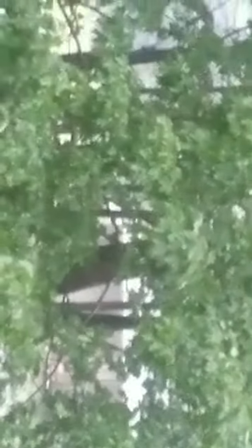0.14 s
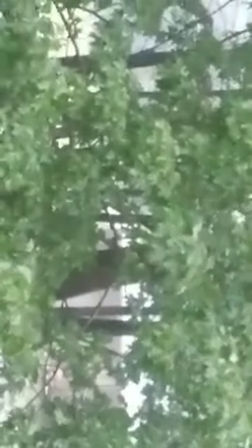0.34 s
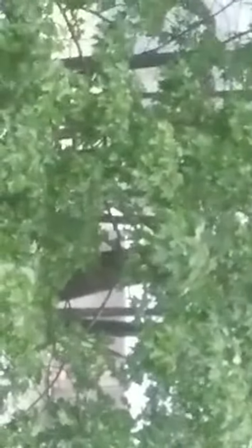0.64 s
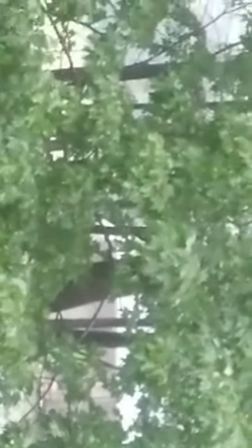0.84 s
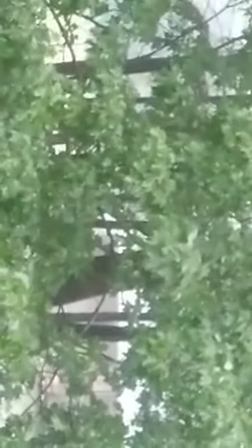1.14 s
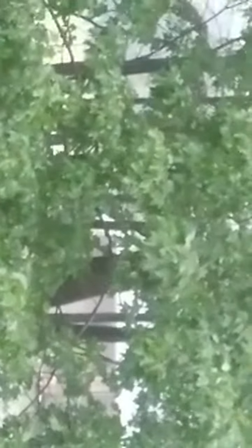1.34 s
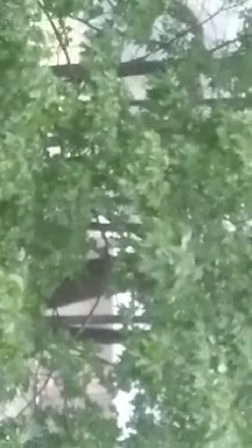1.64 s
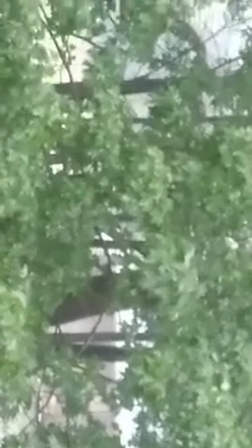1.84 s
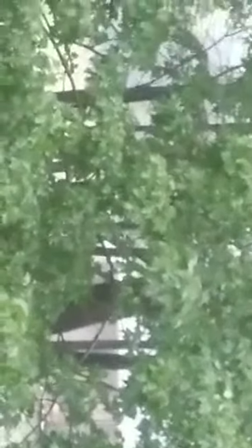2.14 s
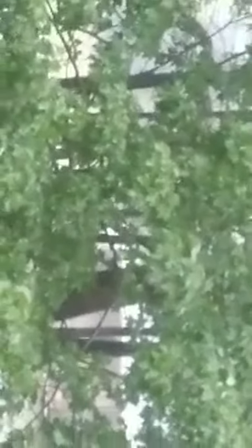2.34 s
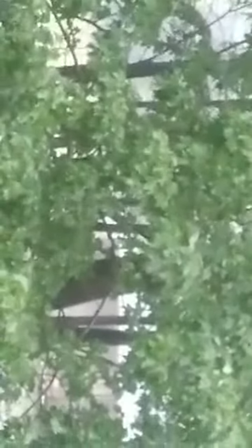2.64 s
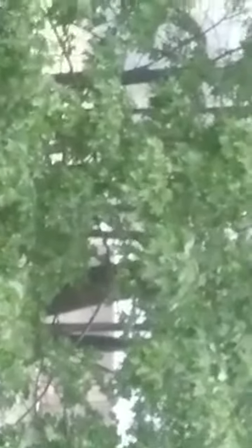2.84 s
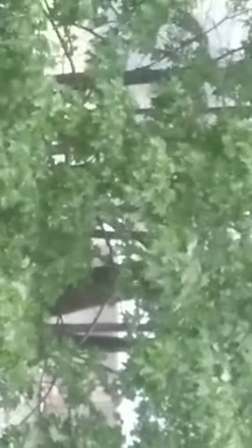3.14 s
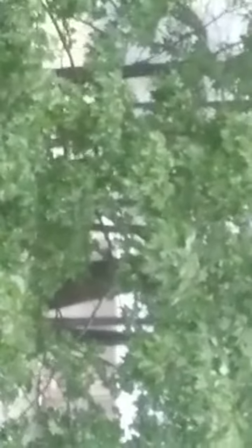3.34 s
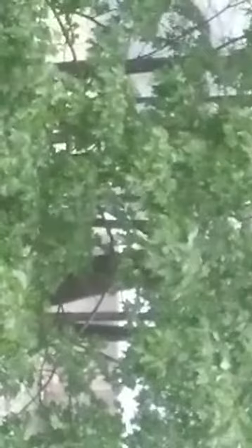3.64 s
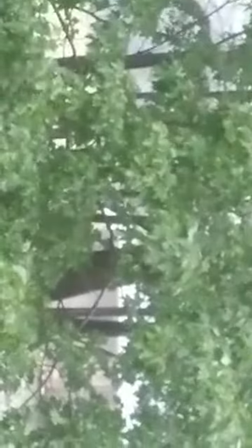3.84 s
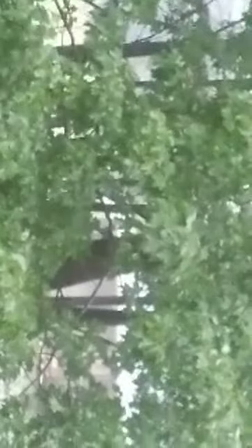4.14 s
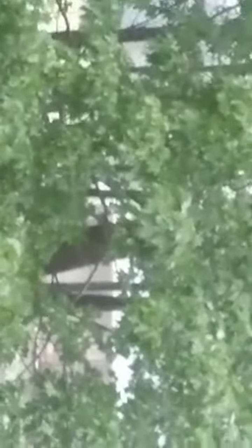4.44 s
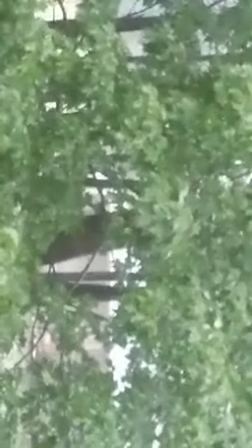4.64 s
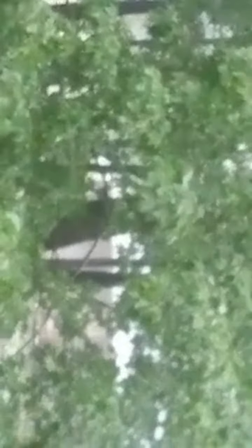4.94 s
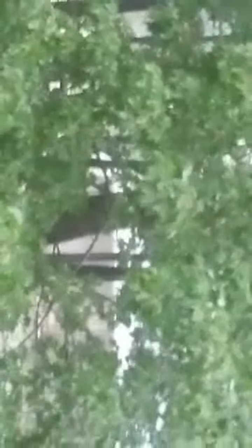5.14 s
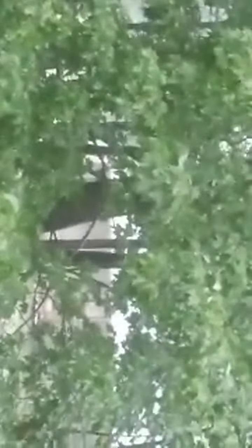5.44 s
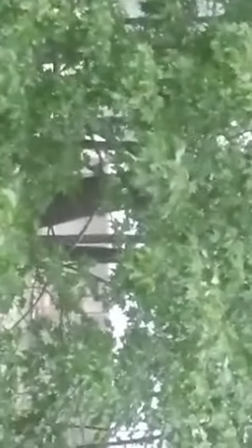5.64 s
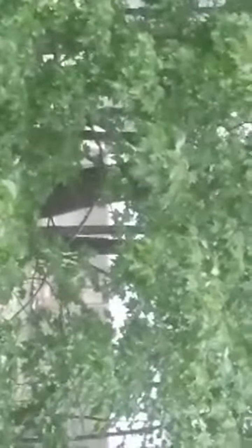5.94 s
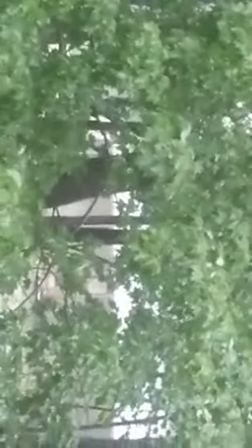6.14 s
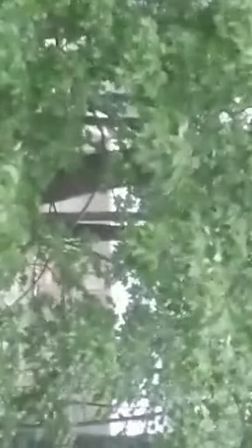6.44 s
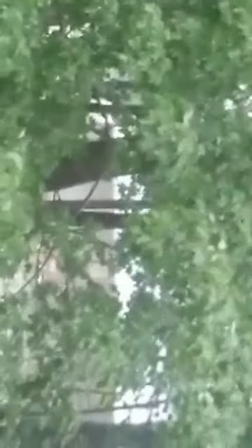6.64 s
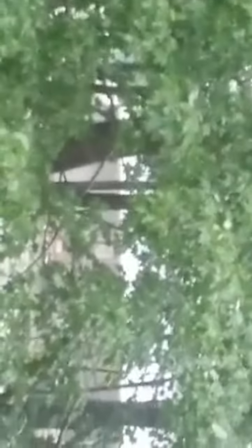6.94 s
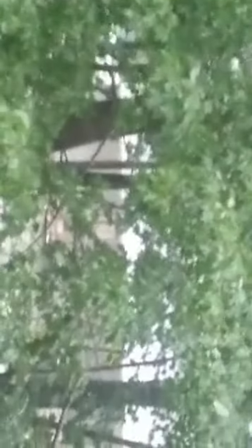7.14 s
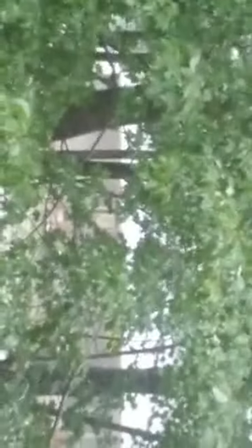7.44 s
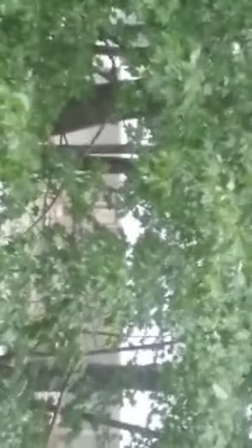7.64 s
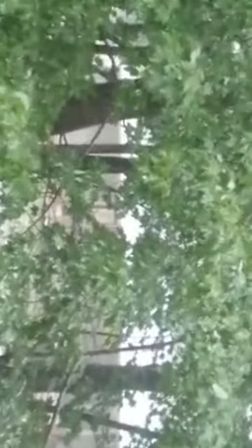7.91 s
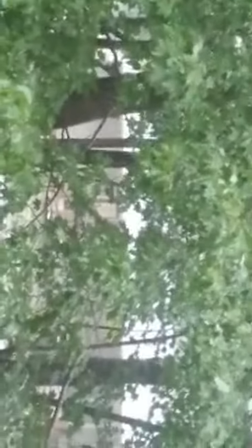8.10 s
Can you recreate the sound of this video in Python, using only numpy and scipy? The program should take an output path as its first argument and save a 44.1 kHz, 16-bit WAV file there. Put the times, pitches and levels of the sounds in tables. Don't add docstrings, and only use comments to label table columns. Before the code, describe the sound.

Outdoors among dense green trees near houses, light rain makes a quiet, steady hiss with a low distant murmur. Irregular nearby drops splash, thump dully on broad leaves, tick and ping. Just before the middle the loudest drop clacks on thin metal and rings briefly, followed by sprays and small bright chimes. Scattered drops continue to the end. A single phone microphone's noise gate chops their tails.

```python
import sys
import numpy as np
from scipy import signal
from scipy.fft import rfft, irfft, next_fast_len
from scipy.io import wavfile
from scipy.ndimage import uniform_filter1d

SR = 44100
rng = np.random.default_rng(int(sys.argv[2]) if len(sys.argv) > 2 else 0)


def boost(x):
    u = np.asarray(x, float) / 20
    return 10 ** u


def int16_out(signal):
    q = np.round(np.clip(np.atleast_2d(signal).T, -1, 1) * 32767)
    wavfile.write(sys.argv[1], SR, q.astype(np.int16))


N = 364707


def shaped(x, gain):
    size = next_fast_len(len(x))
    hz = np.maximum(np.fft.rfftfreq(size, 1 / SR), 1)
    return irfft(rfft(x, size) * gain(hz), size)[:len(x)]


def unit(x):
    return x / np.sqrt(np.mean(x ** 2))


def walk(rate):
    hold = int(SR / rate)
    steps = np.repeat(rng.standard_normal(N // hold + 1), hold)
    slewed = uniform_filter1d(uniform_filter1d(steps, hold), hold)
    return unit(slewed[:N])


def add(out, peak_s, rise_s, fade_s, wave):
    t = np.arange(len(wave)) / SR - rise_s
    swell = np.sin(np.pi / 2 * (1 + t / rise_s)) ** 2
    decay = np.exp(-np.maximum(t, 0) / fade_s)
    shape = np.where(t < 0, swell, decay)
    at = int((peak_s - rise_s) * SR) + np.arange(len(wave))
    inside = (at >= 0) & (at < N)
    out[at[inside]] += (shape * wave)[inside]


def rings(rows, partner=0.41, detune=0.029, count=2, trim_db=1.0):
    out = np.zeros(N)
    chances = rng.random((len(rows), 2, count + 1, 1))
    for (s, hz, db, rise_ms, t60_ms), (pitch, phase) in zip(rows, chances):
        rise = max(rise_ms, .5) / 1000
        fade = max(t60_ms, 2) / 1000 / np.log(1000)
        turn = 2 * np.pi * hz * np.arange(int((rise + 6 * fade) * SR)) / SR
        main = np.sin(turn + 2 * np.pi * phase[0])
        detuned = turn * (1 + detune * (2 * pitch[1:] - 1))
        neighbours = np.sin(detuned + 2 * np.pi * phase[1:]).sum(axis=0)
        add(out, s, rise, fade, boost(db - trim_db) * (main + partner * neighbours))
    return out


def splashes(rows, spread, rise_ms=1.5, stretch=1.26, size=2048):
    out = np.zeros(N)
    for (s, db, centre_hz, fade_ms), spray in zip(rows, rng.standard_normal((len(rows), size))):
        burst = shaped(spray, lambda hz: np.exp(-(np.log(hz / centre_hz) / spread) ** 2 / 2))
        fade = stretch * max(fade_ms, .3) / 1000
        add(out, s, rise_ms / 1000, fade, boost(db) * unit(burst))
    return out


# frequency in Hz, level in dB per Hz.
FAR_SPECTRUM = [(15, -57), (25, -33), (108, -5.5), (249, -2), (317, -4.5), (354, -5), (516, -8.5),
                (695, -11), (863, -11.5), (1160, -11.5), (1790, -9.5), (2000, -11), (3250, -12.5),
                (8360, -11.5), (16000, -25)]
# centre in Hz, width in Hz, lift in dB.
RESONANCES = [(1851, 71, 6), (6900, 1270, 5), (8260, 450, 4), (8900, 380, 1.5), (11500, 670, 1.5),
              (15300, 340, 7)]


def colour(hz):
    far_hz, far_db = np.transpose(FAR_SPECTRUM)
    db = np.interp(np.log(hz), np.log(far_hz), far_db)
    lift_db = sum(lift / (1 + (2 * (hz - f) / width) ** 2) for f, width, lift in RESONANCES)
    return boost(db + lift_db)


# time in seconds, hiss in dB, murmur in dB relative to the hiss.
SHOWER_STRENGTH = [
    (0.0, -59, -0.5),
    (0.76, -59, 0.5),
    (5.27, -59.5, -1.5),
    (5.53, -58, -0.5),
    (6.86, -59, 1.5),
    (7.07, -58, -0.5),
    (7.56, -59.5, 0),
    (8.27, -58.5, -1),
]


def hiss(swell_db=0.57, flicker_db=0.7, trim_db=2):
    s, hiss_db, murmur_db = np.transpose(SHOWER_STRENGTH)
    t = np.arange(N) / SR
    hiss_db, murmur_db = np.interp(t, s, hiss_db), np.interp(t, s, murmur_db)
    far = unit(shaped(rng.standard_normal(N), colour))
    swell = swell_db * walk(25)
    out = np.zeros(N)
    for centre in 16 * 2. ** np.arange(11):
        band = shaped(far, lambda hz: np.cos(np.pi / 2 * np.clip(np.log2(hz / centre), -1, 1)) ** 2)
        out += band * boost(swell + flicker_db * walk(14) + murmur_db * (centre < 600))
    return out * boost(hiss_db + trim_db)


def side_flecks(count=34, db=-63, spread=.09, low_hz=4700, high_hz=15000):
    out = np.zeros(N)
    for (when, place), noise in zip(rng.random((count, 2)), rng.standard_normal((count, 2048))):
        centre_hz = low_hz * (high_hz / low_hz) ** place
        band = unit(shaped(noise, lambda hz: abs(np.log(hz / centre_hz)) < spread))
        level = boost(db) * (colour(centre_hz) / colour(7000.0)) ** 0.89
        add(out, when * N / SR, .02, .012, level * band)
    return out * np.array([[1], [-1]])


def patter(count=700):
    s, place, size, length = rng.random((count, 4)).T
    hz = 150 * (10000 / 150) ** place ** .6
    level_db = -58 + 7 * size ** 2 + 20 * np.log10(colour(hz))
    rise_ms, t60_ms = 2 + 5 * length, 30 * (0.28 + length)
    return rings(np.transpose([s * N / SR, hz, level_db, rise_ms, t60_ms]), count=1)


def spatter(count, db, spread, scatter_db=6):
    s, place, size, length = rng.random((count, 4)).T
    level_db = db + scatter_db * size ** 2
    centre_hz, fade_ms = 5300 + 4200 * place, 0.45 + 5 * length
    return splashes(np.transpose([s * N / SR, level_db, centre_hz, fade_ms]), spread, size=1024)


# gate opening in seconds, time open in ms, lift in dB,
# splash rms in dB with the gate shut.
GATE_DROPS = [(0.402, 7.9, 13, -55.5), (0.669, 11.7, 11, -60), (0.741, 6.8, 13.5, -55),
              (0.9986, 29.7, 11.5, -65), (1.0436, 7.1, 14, -54), (1.9182, 22, 11, -65),
              (1.951, 7.2, 11, -55), (2.799, 11.5, 12, -59), (3.1206, 7.5, 14.5, -60),
              (3.367, 68.6, 11, -68), (3.5055, 47, 11.5, -56), (3.794, 160, 10, -51),
              (4.1362, 150, 11.5, -65), (4.322, 7.4, 10.5, -56), (4.6782, 52, 12.5, -54),
              (4.8272, 50, 11.5, -53), (5.3405, 14.5, 12, -55), (5.5, 24, 11, -55),
              (5.5483, 11.7, 13.5, -57), (5.676, 12.3, 11.5, -59), (6.5372, 83, 11, -53),
              (6.656, 25, 9.5, -64), (7.0302, 11.2, 12.5, -62), (7.295, 8.8, 9.5, -52),
              (8.153, 5.6, 9.5, -49), (8.2384, 15.4, 13, -61)]
# peak in seconds, rms in dB with the gate shut.
OTHER_SPLASHES = [(0.2965, -57), (0.4915, -53), (0.601, -45.5), (0.7914, -56), (0.804, -51), (1.0808, -51),
                  (1.3643, -60), (1.8008, -51), (2.925, -56), (3.4036, -52), (3.4154, -58), (3.8893, -54),
                  (3.9453, -54), (4.1199, -55), (4.5114, -48), (4.6373, -56), (4.7021, -56), (4.8651, -56),
                  (5.5195, -55), (5.5935, -53), (5.7341, -51), (5.7473, -46), (6.5, -54), (6.5697, -55),
                  (6.908, -57), (6.9161, -52), (6.9812, -59), (7.0701, -55), (7.324, -52), (7.9397, -57)]


def near_splashes(lag_ms=5, centre_hz=6230, scatter=0.11, fade_ms=2.2):
    rows = [(s + lag_ms / 1000, db) for s, *_, db in GATE_DROPS] + OTHER_SPLASHES
    chance = rng.uniform(-1.3, 1, (len(rows), 2))
    return splashes([(s, db, centre_hz * (1 + scatter * pitch), fade_ms * (1 + .3 * length))
                     for (s, db), (pitch, length) in zip(rows, chance)], spread=0.32)


# peak in seconds, pitch in Hz, peak level in dB
# with the gate shut, t60 in ms.
LEAF_THUMPS = [(0.4051, 383, -57, 85), (0.4406, 555, -53, 24), (0.6747, 259, -43, 39),
               (0.7939, 269, -46.5, 21), (0.8045, 298, -48.5, 20), (1.0044, 432, -45, 28),
               (1.0048, 290, -53.5, 32), (1.0232, 407, -50, 47), (1.8818, 227, -48, 30),
               (1.9261, 260, -45, 28), (1.939, 257, -54, 25), (2.2634, 260, -50, 19),
               (2.8059, 206, -47, 45), (3.3793, 247, -40.5, 41), (3.412, 273, -51, 65),
               (3.8461, 787, -58.5, 30), (4.01, 248, -54, 60), (4.1432, 501, -57, 39),
               (4.2926, 506, -47.5, 50), (6.664, 390, -40, 57), (6.8813, 465, -52.5, 61),
               (6.9546, 763, -59.5, 46), (7.1135, 845, -56, 24), (7.3222, 374, -53, 24),
               (7.523, 526, -52.5, 45), (7.79, 109, -57, 81), (7.87, 152, -54, 90), (3.385, 106, -60, 110),
               (8.1903, 515, -56, 33), (8.2447, 388, -47, 53)]
# peak in
# seconds, pitch in Hz, peak level in dB.
PUDDLE_PINGS = [(0.5974, 4243, -57), (1.097, 4260, -55), (1.9223, 1270, -61), (3.1248, 2317, -50),
                (3.322, 3280, -53), (3.5131, 1883, -43.5), (3.8012, 2862, -55.5), (3.8013, 2330, -57),
                (4.178, 4717, -58), (4.2922, 2947, -58), (4.6388, 3068, -57), (4.7463, 1702, -51),
                (4.8335, 1786, -49), (5.345, 4663, -50.5), (5.352, 4663, -50), (5.5554, 2330, -48),
                (5.597, 3471, -53), (5.6835, 3671, -47), (5.7061, 4158, -55), (5.7943, 2636, -55),
                (6.1731, 1685, -56), (6.4109, 2710, -57), (6.5276, 5138, -51), (6.6155, 2880, -57.5),
                (7.0732, 2214, -51.5), (7.133, 1800, -54.5), (7.3002, 3497, -52.5), (7.9606, 1795, -50),
                (8.2426, 1275, -66), (3.5141, 550, -59)]
# peak in seconds, pitch in Hz, peak level in dB.
LEAF_TICKS = [(0.2912, 7082, -54), (0.4914, 6382, -52), (0.5974, 6155, -55), (1.0487, 7106, -56),
              (1.9565, 7000, -51), (1.9594, 7935, -49), (3.1247, 6902, -55), (3.8015, 6337, -39),
              (4.1428, 6145, -50.5), (4.15, 10263, -59), (4.1732, 6459, -50), (4.1992, 7469, -44),
              (4.2154, 7438, -48), (4.5085, 6792, -59), (4.6874, 5807, -44.5), (4.7016, 8897, -51),
              (4.8307, 6616, -58), (4.8315, 8033, -46), (5.5074, 9390, -54), (5.52, 7824, -53),
              (5.6811, 5593, -55), (5.7319, 7455, -53), (6.542, 10759, -60), (6.5462, 7171, -50),
              (6.5692, 6667, -54), (6.9117, 5881, -56), (7.2978, 6664, -56)]
# peak in seconds, pitch in Hz, peak level in dB.
METAL_CHIMES = [
    (4.146, 8350, -51),
    (4.16, 6200, -54),
    (4.1735, 7520, -42.5),
    (5.6811, 10468, -65),
    (6.546, 8560, -48.5),
    (6.546, 9900, -51),
    (7.036, 6280, -49.5),
]


def near_rings():
    rows = [(s, hz, db, 10, t60_ms) for s, hz, db, t60_ms in LEAF_THUMPS]
    # its drops, rise in ms, t60 in ms
    for drops, rise_ms, t60_ms in ((PUDDLE_PINGS, 7, 45), (LEAF_TICKS, 6.5, 35), (METAL_CHIMES, 7.3, 135)):
        rows += [(*drop, rise_ms, t60_ms) for drop in drops]
    return rings(rows)


def foliage(x, db=-13, t60=.1):
    t = np.arange(8192) / SR
    tail = rng.standard_normal(len(t)) * np.exp(-t * np.log(1000) / t60) * (t > .004)
    return x + boost(db) * signal.fftconvolve(x, tail / np.linalg.norm(tail))[:N]


# peak in
# seconds, rms in dB, centre in Hz, fade in ms.
LONG_SPRAYS = [(3.8035, -40, 4850, 2.7), (3.812, -50.5, 4800, 47), (3.8, -58, 12200, 3.7),
               (3.8, -57, 14200, 6), (4.2, -59, 6140, 14), (4.148, -55.5, 10200, 27),
               (4.15, -58, 11300, 30), (4.15, -55, 6000, 20), (4.155, -60, 4600, 18),
               (4.502, -58, 6250, 36), (4.8, -62, 7037, 33), (5.508, -51, 8100, 8), (6.56, -55, 6800, 20)]


def sheet_and_leaf_sprays():
    return splashes(LONG_SPRAYS, spread=0.11, rise_ms=6, size=8192)


# peak in seconds, pitch in Hz, peak in dB, rise in ms, t60 in ms.
SHEET_MODES = [
    (3.8038, 4900, -30.5, 1.19, 9),
    (3.803, 4295, -49, 5, 260),
    (3.806, 4358, -50, 5, 230),
    (3.808, 4490, -50, 6, 220),
    (3.808, 4632, -42.5, 8, 240),
    (3.804, 4752, -45, 4, 150),
    (3.803, 5030, -41, 4.3, 45),
    (3.806, 5098, -51, 5, 200),
    (3.826, 6475, -54, 12, 170),
]


def metal_sheet():
    return rings(SHEET_MODES, partner=.22, detune=.012, count=4)


def scene():
    far = hiss() + patter() + spatter(count=250, db=-68, spread=0.39)
    far += spatter(count=900, db=-63.5, spread=.08)
    near = foliage(near_rings() + near_splashes())
    return np.tile(far + near + metal_sheet() + sheet_and_leaf_sprays(), (2, 1))


# opening in seconds, lift in dB.
GATE_FLICKERS = [(0.0027, 3), (0.3272, 7), (0.4169, 7), (0.5033, 10.5), (1.0776, 6), (1.0968, 5),
                 (1.2462, 9.5), (1.3191, 5.5), (2.0177, 3), (2.0806, 9), (2.6246, 4.6), (2.9211, 9.5),
                 (4.117, 6), (4.499, 7.5), (4.635, 4.5), (4.743, 4), (5.0914, 5.5), (5.59, 4), (6.4968, 14),
                 (6.506, 11), (6.5171, 8), (6.9057, 10), (6.917, 7), (6.953, 5), (6.977, 4.5), (7.1289, 2),
                 (7.243, 3), (7.3345, 8.5), (7.822, 6.5), (7.957, 6)]
# opening in seconds, lift in dB.
GATE_FLUTTERS = [
    (0.2855, 3),
    (0.772, 4.5),
    (0.788, 7),
    (1.3556, 5),
    (5.689, 4.5),
    (6.239, 2),
]


def gate_lift_db(flicker_ms=4.64, flutter_ms=18, edge=.0012):
    t, lift_db = np.arange(N) / SR, np.zeros(N)
    openings = [drop[:-1] for drop in GATE_DROPS]
    openings += [(s, flicker_ms, db) for s, db in GATE_FLICKERS]
    openings += [(s, flutter_ms, db) for s, db in GATE_FLUTTERS]
    for s, ms, db in openings:
        a, b = max(int((s - .01) * SR), 0), int((s + ms / 1000 + .01) * SR)
        since = t[a:b] - s
        step = np.tanh(since / edge) - np.tanh((since - ms / 1000) / edge)
        lift_db[a:b] += db * step / 2
    return lift_db


def band_limit(x):
    return signal.sosfilt(signal.butter(12, 16340, fs=SR, output="sos"), x)


def record(dry):
    gated = dry[0] * boost(gate_lift_db())
    limited = shaped(gated, lambda hz: (hz < 15760) / np.sqrt(1 + (35 / hz) ** 6))
    return band_limit(limited + side_flecks())


dry = scene()
out = record(dry)
int16_out(out)
```